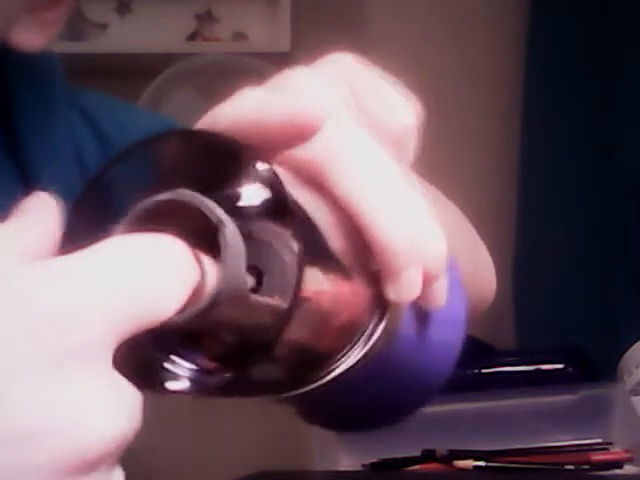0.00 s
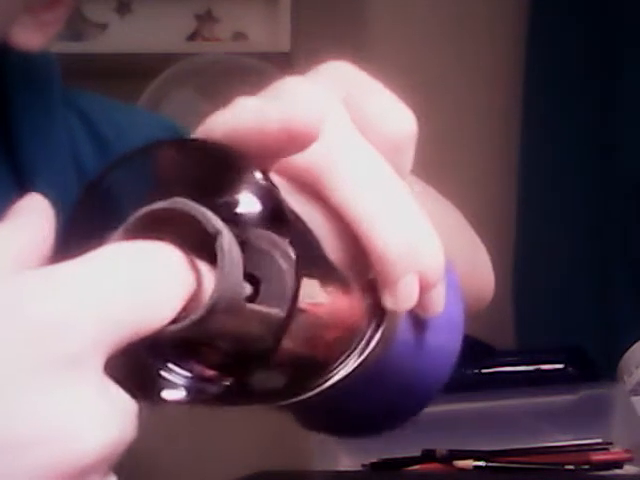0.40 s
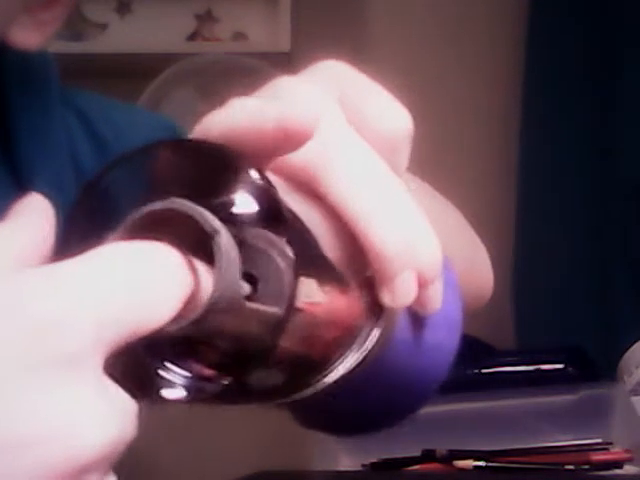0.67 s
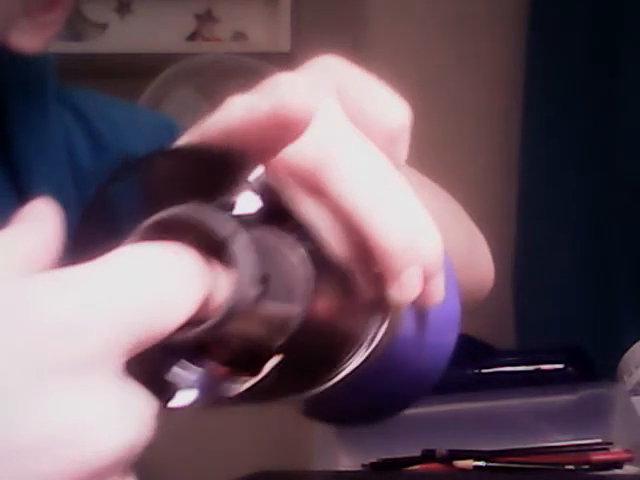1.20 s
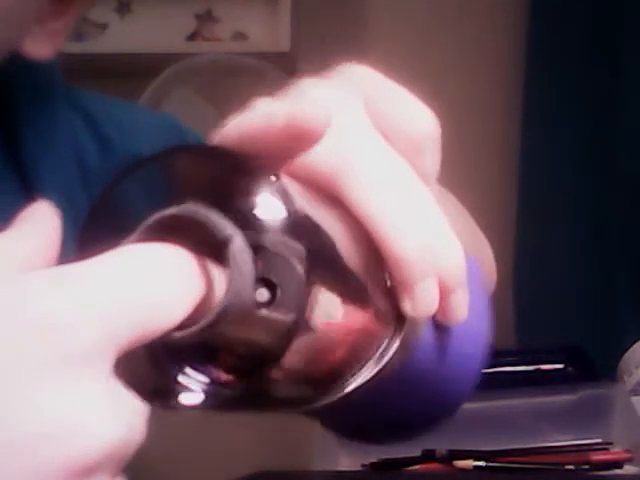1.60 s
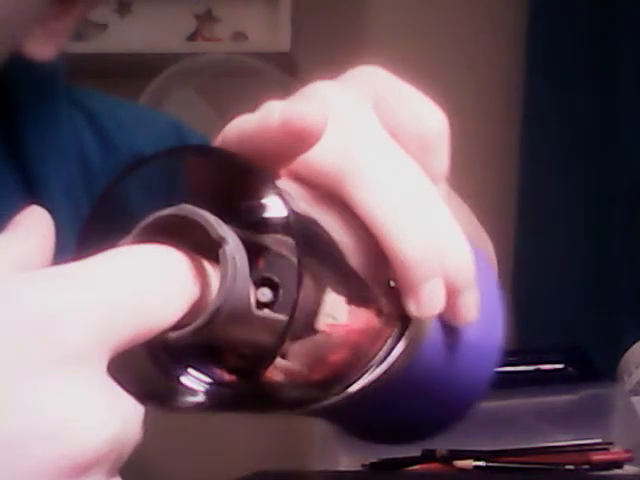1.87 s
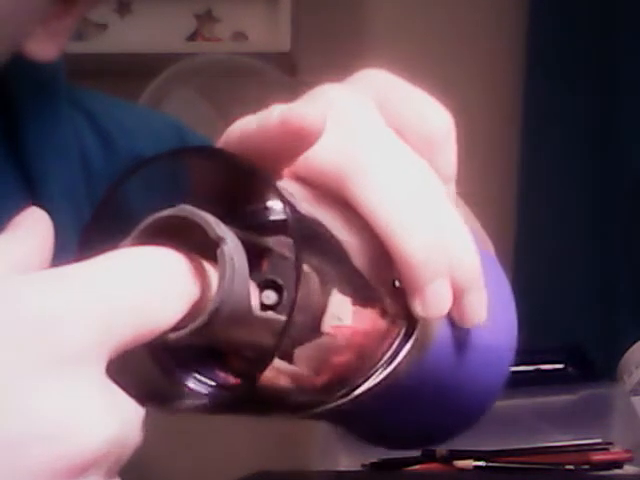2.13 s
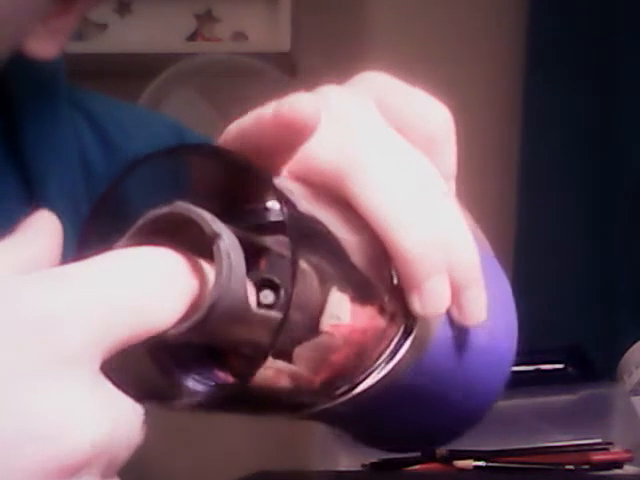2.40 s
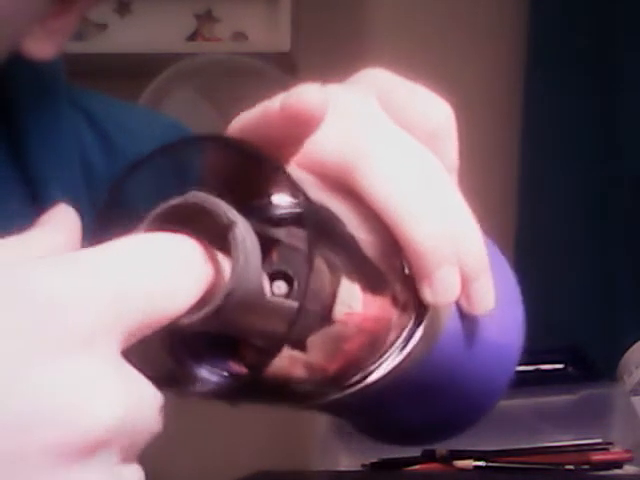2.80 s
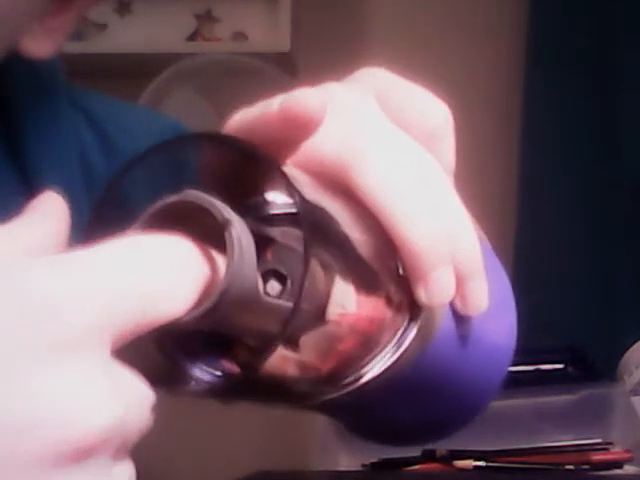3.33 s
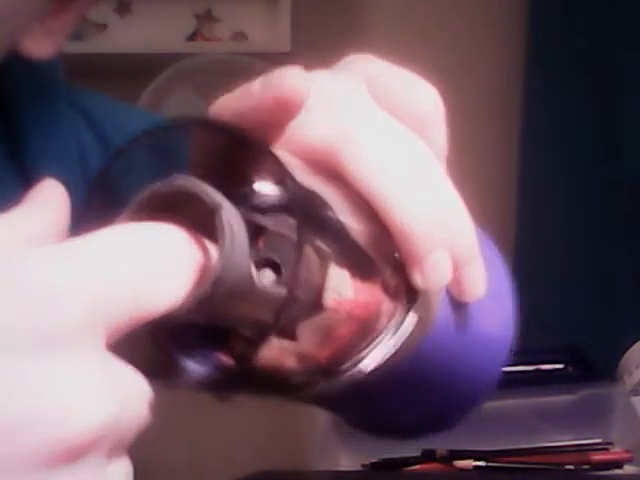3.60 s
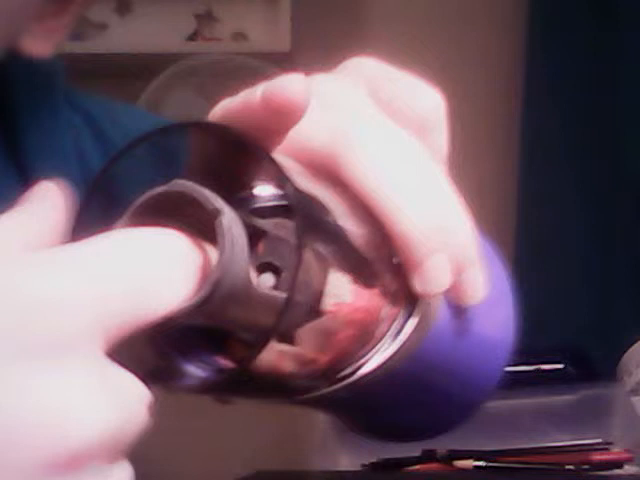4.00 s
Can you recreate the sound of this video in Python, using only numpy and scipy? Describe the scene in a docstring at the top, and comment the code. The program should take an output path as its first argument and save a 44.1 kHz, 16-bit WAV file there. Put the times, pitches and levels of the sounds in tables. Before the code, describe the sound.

A hand-held battery pencil sharpener runs close by in four short bursts, the second longest. Each starts with a switch tick, buzzes with rattling, whining plastic gears, then coasts down with falling tones. The room is quiet, with faint hiss.

```python
"""A hand-held battery pencil sharpener runs in four short bursts in a quiet room.
Each time a switch ticks, the small motor spins up, and its loose plastic gears rattle and whine
in the shell, easing once per turn of the cutter. Switched off, the gears coast to a stop with
falling tones and a few knocks. The hand rumbles faintly on the case over a dull background hiss."""
import sys
import numpy as np
from scipy import signal
from scipy.fft import rfft, irfft
from scipy.io import wavfile
from scipy.ndimage import uniform_filter1d

SR = 44100
rng = np.random.default_rng(int(sys.argv[2]) if len(sys.argv) > 2 else 0)


def persist_wave(psi):
    """Save psi, clipped to +-1, as 16-bit WAV."""
    counts = np.round(np.clip(psi, -1, 1) * 32767).astype(np.int16)
    wavfile.write(sys.argv[1], SR, np.atleast_2d(counts).T)


N = 176400
TIME = np.arange(N) / SR
TEETH, MOTOR_TURNS_PER_CUTTER_TURN = 10, 15.15   # the teeth are on the motor's small gear


def from_db(db):
    """Turn decibels (dB) into a number to multiply by."""
    return 10 ** (np.asarray(db) / 20)


def unit_power(x):
    """Scale a sound so that its average power is 1."""
    return x / np.sqrt(np.mean(x ** 2) + 1e-20)


def drift(rate_hz):
    """A smooth random wobble of typical size 1; a higher rate wobbles faster."""
    step = 40   # samples between random points
    r = np.exp(-2 * np.pi * rate_hz * step / SR)
    slow = signal.lfilter([1], [1, -2 * r, r * r], rng.standard_normal(N // step + 2002))[2000:]
    return np.interp(np.arange(N) / step, np.arange(len(slow)), unit_power(slow))


def resonate(x, hz, width_hz):
    """Make a sound ring at one pitch; a narrower filter rings longer."""
    r = np.exp(-np.pi * width_hz / SR)
    feedback = [1, -2 * r * np.cos(2 * np.pi * hz / SR), r * r]
    return signal.lfilter(np.array([1, 0, -1]) * (1 - r * r) / 2, feedback, x + 1e-18)


def resonate_twice(x, hz, width_hz):
    """Filter twice to pick out the pitch more sharply."""
    return resonate(resonate(x, hz, width_hz), hz, width_hz)


def keep_band(x, hz, kind, order=2):
    """Keep the "low", "high" or middle ("band") part of a sound."""
    return signal.sosfilt(signal.butter(order, hz, kind, fs=SR, output="sos"), x)


# The tone of the background. Each row: frequency in Hz, relative level in dB.
ROOM_SPECTRUM = [(25, -27.5), (50, -12.5), (100, -3), (170, -5), (300, -7), (600, -13.5), (1200, -21.5),
                 (2500, -25), (6000, -27), (8500, -37)]

def room_tone(level_db=-59.5):
    """The quiet room: steady noise, strongest in the low notes."""
    hz, db = np.transpose(ROOM_SPECTRUM)
    frequencies = np.arange(N // 2 + 1) * SR / N
    colour = from_db(np.interp(np.log(frequencies + 1), np.log(hz), db))
    return from_db(level_db) * unit_power(irfft(rfft(rng.standard_normal(N)) * colour, N))


def room_echo(x, level_db=-9, fade_s=0.28):
    """A furnished room answers with a short, weak echo."""
    t = TIME[:SR // 2]
    tail = rng.standard_normal(len(t)) * from_db(-60 * t / fade_s) * (t > .003)
    return from_db(level_db) * signal.fftconvolve(x, tail / np.linalg.norm(tail))[:N]


# Shifts of the grip. Each row: middle and length in seconds, pitch and filter width in Hz, level in dB.
GRIP_SHIFTS = [(3.064, 0.083, 47, 9.1, -67), (3.818, 0.14, 160, 74, -59.5), (3.912, 0.27, 103, 29, -57.5)]

def hand_rumble():
    """The hand moves on the case and makes soft, low swells of noise."""
    out = 0
    for s, length, hz, width, db in GRIP_SHIFTS:
        swell = np.exp(-2 * ((TIME - s) / length) ** 2)
        out += from_db(db) * swell * unit_power(resonate_twice(rng.standard_normal(N), hz, width))
    return out


# The switch closes. Each row: time in seconds, relative level in dB.
SWITCH_TICKS = [(.1225, -36), (1.2425, -36), (2.9495, -38), (3.6565, -35)]
# Its touch and bounce. Each row: pitch and width in Hz, added level in dB, delay in seconds.
CONTACT_RINGS = [(6560, 1500, 1, 0), (8400, 170, -10.5, 0.0037)]

def switch():
    """The contacts touch and bounce once, ringing briefly each time."""
    out = np.zeros(N)
    for hz, width, ring_db, delay in CONTACT_RINGS:
        clicks = np.zeros(N)
        for s, db in SWITCH_TICKS:
            clicks[int((s + delay) * SR)] = from_db(db + ring_db)
        out += resonate(clicks, hz, width) * SR / (2 * np.pi * width)
    return out


# The bursts. Each row: switch-on, switch-off and coasting time in seconds, top speed in turns
# per second, the cutter's starting angle in turns, relative level in dB.
MOTOR_RUNS = [(0.124, 0.948, 0.31, 289.6, 0.046, 1), (1.242, 2.524, .265, 291.7, -0.041, 1.5),
              (2.95, 3.281, .28, 296.8, -0.004, 2.5), (3.656, 4.052, .27, 296, 0.018, 2.5)]

def motor_motion(spin_up_s=.048, creep_s=.2, creep_share=.13):
    """The motor leaps up, creeps to top speed, then coasts. Gives speed (0 to 1) and turns made."""
    speed, rotor, cutter = np.zeros((3, N))   # rotor counts motor turns, cutter counts cutter turns
    for on, off, coast, top_hz, angle, _ in MOTOR_RUNS:
        driven = np.clip(TIME - on, 0, off - on)
        rise = 1 - (1 - creep_share) * np.exp(-driven / spin_up_s)
        rise -= creep_share * np.exp(-driven / creep_s)
        fall = np.clip(1 - (TIME - off) / coast, 0, 1) ** 1.15
        run_speed = np.maximum(rise, 0) * fall
        turns = np.cumsum(run_speed * top_hz) / SR
        speed, rotor = speed + run_speed, rotor + turns
        cutter = np.where(TIME >= on, angle + turns / MOTOR_TURNS_PER_CUTTER_TURN, cutter)
    return speed, rotor, cutter


def motor_hum(speed, rotor, poles=3):
    """The magnets tug three times a turn; the small case only lets the hum out at higher speeds."""
    tugs = np.sqrt(2) * np.sin(2 * np.pi * poles * rotor) * from_db(-51 + drift(12))
    hum = keep_band(tugs * np.minimum(speed / 0.75, 1) ** 4, 630, "high")
    return 0.2 * hum + 1.65 * resonate(hum, hz=694, width_hz=120)


# Moments when the gears run slack. Each row: time in seconds, depth of the dip in dB.
SLACK_MOMENTS = [(.253, 9.5), (0.384, 5), (.662, 8), (1.424, 3.5), (1.614, 8), (1.725, 11), (2.08, 8),
                 (2.303, 4), (2.452, 0.5), (2.508, 9.5), (3.218, 5)]

def gear_load(cutter, ease_db=4.8, slack_s=0.0031):
    """The push on the teeth varies by burst, eases once per cutter turn and dips when they run slack."""
    ease = (.5 + .5 * np.cos(2 * np.pi * cutter)) ** 3.5
    slack_db = sum(depth * np.exp(-.5 * ((TIME - s) / slack_s) ** 2) for s, depth in SLACK_MOMENTS)
    latest_first = MOTOR_RUNS[::-1]
    run_db = np.select([TIME >= run[0] for run in latest_first], [run[-1] for run in latest_first])
    return from_db(run_db - ease * (ease_db + drift(19)) - slack_db)


# Coasting tones. Each row: vibrations per motor turn, the shell's ringing pitch and filter width
# in Hz, relative level in dB.
COASTING_TONES = [(5, 1290, 180, -47), (6, 1000, 120, -46.5), (9, 1600, 270, -45.5), (10, 1000, 160, -54.5),
                  (17, 3330, 310, -44)]

def coasting_whirr(speed, rotor):
    """As the gears slow, each falling tone swells when it passes a pitch at which the shell rings."""
    coasting = uniform_filter1d(1. * (np.gradient(speed) < 0), size=900)
    out = 0
    for per_turn, hz, width, db in COASTING_TONES:
        tone = np.sin(2 * np.pi * per_turn * rotor) * coasting * from_db(db + 2 * drift(80))
        out += resonate_twice(tone, hz, width)
    return out


# How strongly the gears ring. Each row: time in seconds, level in dB when right on their pitch.
FLARE_STRENGTH = [(.2, -27.5), (1.0, -28.5), (1.33, -29), (2.58, -31.5), (3.03, -30.5), (3.34, -26.5),
                  (3.74, -28)]

def gear_flare(angle):
    """The tone of the meeting teeth flares as it slides through the gears' own ringing pitch."""
    tooth_tone = np.sin(TEETH * angle) * from_db(1.1 * drift(80))
    strength = from_db(np.interp(TIME, *np.transpose(FLARE_STRENGTH)))
    return strength * resonate_twice(tooth_tone, hz=2246, width_hz=220)


# The tones of the whine. Each row: vibrations per motor turn, relative level in dB.
WHINE_TONES = [(5, -60.5), (8, -41.5), (9, -39.5), (10, -46.5), (11, -55.5), (19, -55), (20, -54.5)]

def gear_whine(speed, rotor, load, wobble_turns=0.0049, waver_db=2.5):
    """Teeth meeting on a wobbling shaft make wavering tones that grow quickly with speed."""
    angle = 2 * np.pi * (rotor + wobble_turns * drift(38))
    tones = sum(from_db(db + waver_db * drift(24)) * np.cos(per_turn * angle)
                for per_turn, db in WHINE_TONES)
    return tones * load * speed ** 4.1 + gear_flare(angle)


# How bright the clatter is. Each row: time in seconds, treble boost in dB.
TREBLE_CURVE = [(.15, -5), (.31, -2.5), (.42, 0), (.65, 2), (1.0, 0), (1.4, 0), (2.0, 2), (2.43, 2.5),
                (2.58, -1), (2.72, 4.5), (3.0, 1.5), (3.2, 0.5), (3.4, 0.5), (3.9, 1)]

def treble_gain(cutter, swell_db=0.5, flutter_db=1.7):
    """The high part of the clatter flutters, and swells a little once per cutter turn."""
    swell = swell_db * np.cos(2 * np.pi * cutter)
    return from_db(np.interp(TIME, *np.transpose(TREBLE_CURVE)) + swell + flutter_db * drift(100))


# The pitches at which the shell rings. Each row: pitch and width in Hz, relative level in dB.
SHELL_RINGS = [(246, 51, -12), (425, 142, -21.5), (678, 154, -21), (993, 99, -15), (1301, 152, -14.5),
               (1525, 157, -14.5), (2177, 110, -1), (2283, 75.6, -0.5), (2565, 99, -7.5), (2957, 55, -14),
               (3258, 110, -13.5), (3623, 80, -17), (4200, 570, -21), (5843, 383, -7), (5795, 700, -10.5),
               (7740, 1800, -30.5)]

def plastic_shell(force, speed, treble):
    """The shell rings when struck; faster, harder blows bring out its higher pitches."""
    out = 0
    for k, (hz, width, db) in enumerate(SHELL_RINGS):
        speed_power = max(0.64 + 0.32 * np.log2(hz / 2200), .3)
        drive = force * (speed + 1e-6) ** speed_power * (treble if hz > 3900 else 1)
        out += (-1) ** k * from_db(db) * resonate(drive, hz, width)
    return out


# Knocks while starting and stopping. Each row: time in seconds, strength in dB.
SLACK_KNOCKS = [(1.105, -46), (1.165, -38), (1.262, -47), (2.669, -45), (2.717, -39.5), (2.747, -40.5),
                (2.767, -44.5), (2.981, -41.5), (3.44, -40.5), (3.55, -52)]

def gear_knocks():
    """Loose teeth give single soft knocks that ring the shell."""
    hits = np.zeros(N)
    for s, db in SLACK_KNOCKS:
        hits[int(s * SR)] = from_db(db)
    softened = keep_band(hits + 1e-18, [1200, 3000], "band")
    ring = plastic_shell(softened, speed=1, treble=0.88)
    return ring * hits.max() / np.abs(ring).max()


# The ring of a slap. Each row: pitch and filter width in Hz, relative level in dB.
SLAP_RINGS = [(2480, 190, -5), (5604, 470, 1.5), (6045, 730, 0)]

def gear_slap(speed, rotor, load, treble, level_db=-48, jitter_turns=.06, spread_db=3):
    """The small off-centre gear slaps its partner once a turn, hardest at top speed."""
    turns = np.arange(1, 1200)
    late, size = rng.standard_normal((2, len(turns)))
    hit_samples = np.searchsorted(rotor, turns + jitter_turns * late)
    hits = np.bincount(hit_samples, from_db(spread_db * np.minimum(size, 1)), N + 1)[:N]
    hits *= load * speed ** 2.6 * treble
    rings = sum(from_db(db) * resonate_twice(hits * rng.uniform(0.17, 1, N), hz, width)
                for hz, width, db in SLAP_RINGS)
    return from_db(level_db) * unit_power(rings)


def gear_rattle(speed, rotor, load, treble, level_db=-37.5, jitter_teeth=.6):
    """Each tooth knocks a little early or late and rubs, which sets the shell ringing."""
    teeth = np.arange(1, 12000)
    late, size_db = rng.standard_normal((2, len(teeth)))
    hit_samples = np.searchsorted(rotor, (teeth + jitter_teeth * late) / TEETH)
    hits = np.bincount(hit_samples, from_db(np.minimum(size_db, 2)), N + 1)[:N]
    knocks = unit_power(keep_band(hits, 600, "high"))
    rubbing = 0.1 * speed * rng.standard_normal(N)
    off_centre = np.exp(0.37 * np.cos(2 * np.pi * rotor))   # harder on one side of every turn
    # coasting gears run looser, most of all near 65% of top speed
    loose_db = 1.5 * np.exp(-.5 * ((speed - 0.65) / 0.13) ** 2) * (np.gradient(speed) < 0)
    force = (knocks + rubbing) * off_centre * load * from_db(loose_db)
    return from_db(level_db) * unit_power(plastic_shell(force, speed, treble))


def scene():
    """The sharpener close by, with the room behind it."""
    speed, rotor, cutter = motor_motion()
    load, treble = gear_load(cutter), treble_gain(cutter)
    clatter = gear_rattle(speed, rotor, load, treble) + gear_slap(speed, rotor, load, treble)
    clatter += gear_knocks() + switch()
    tones = gear_whine(speed, rotor, load) + coasting_whirr(speed, rotor) + motor_hum(speed, rotor)
    return (clatter + room_echo(clatter) + tones + hand_rumble() + room_tone())[None]


def record(dry, dull_hz=8030, cutoff_hz=8750):
    """The microphone dulls the highest sounds, and a steep filter cuts off the rest above them."""
    dull = keep_band(dry, dull_hz, "low", order=8)
    return signal.sosfilt(signal.ellip(12, .3, 80, cutoff_hz, fs=SR, output="sos"), dull)


dry = scene()
out = record(dry)
persist_wave(out)
```